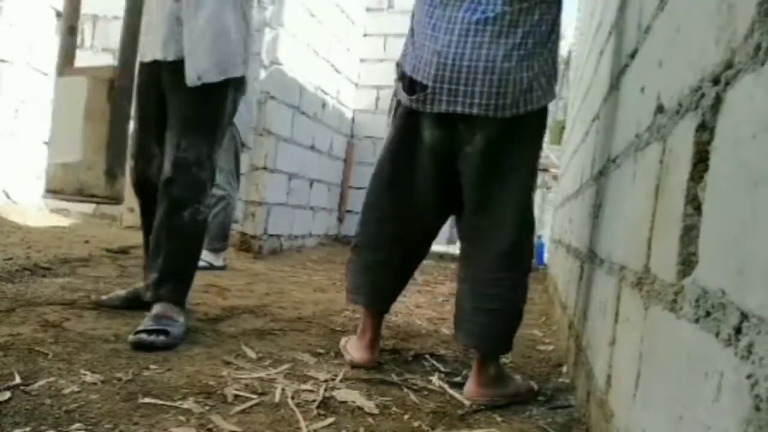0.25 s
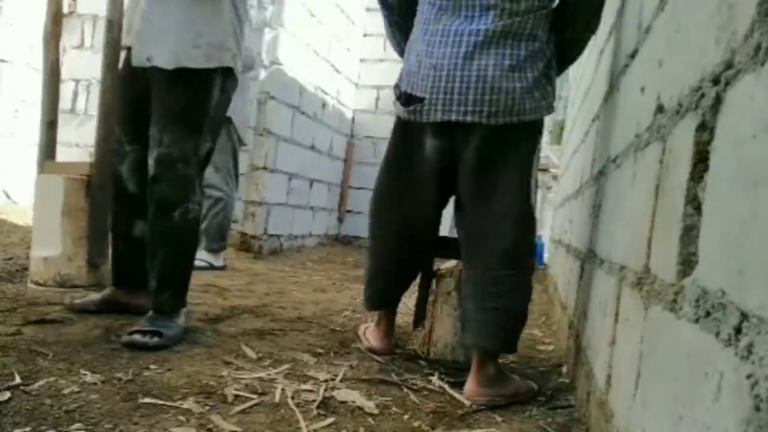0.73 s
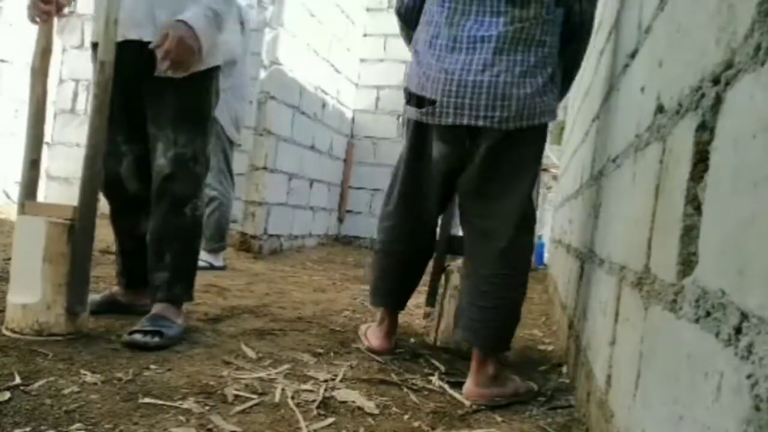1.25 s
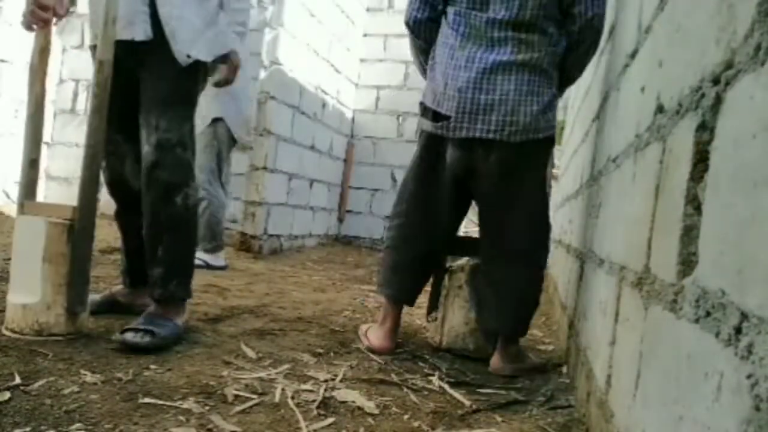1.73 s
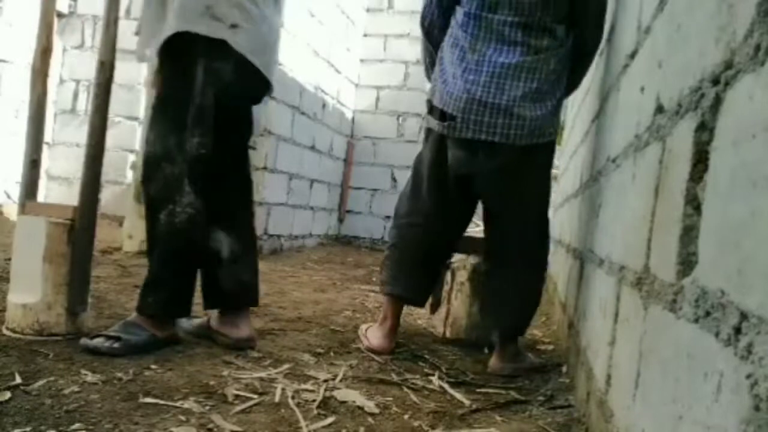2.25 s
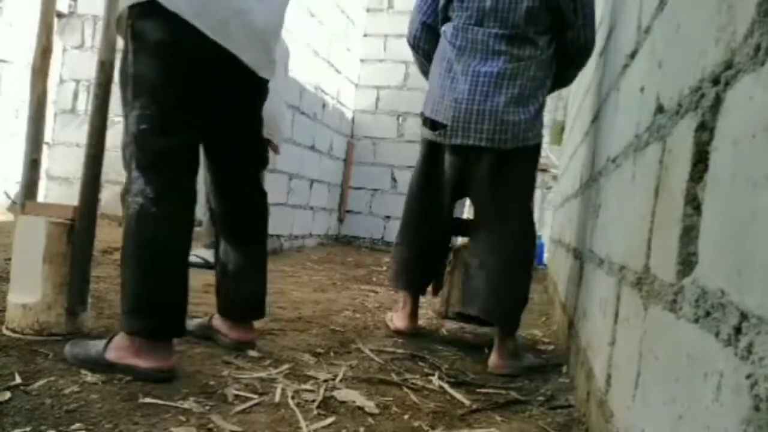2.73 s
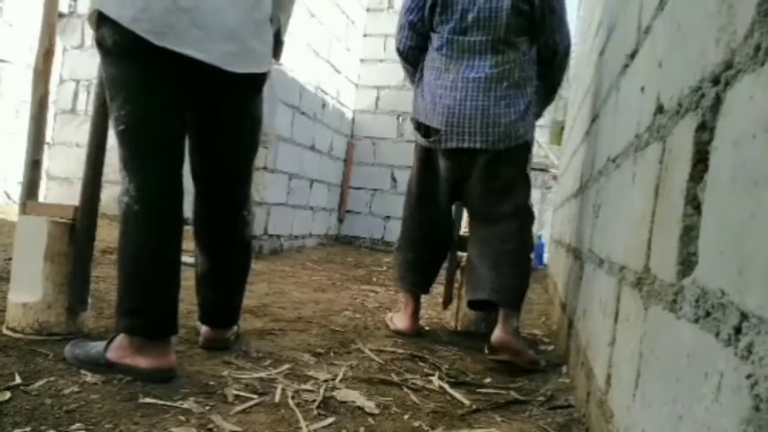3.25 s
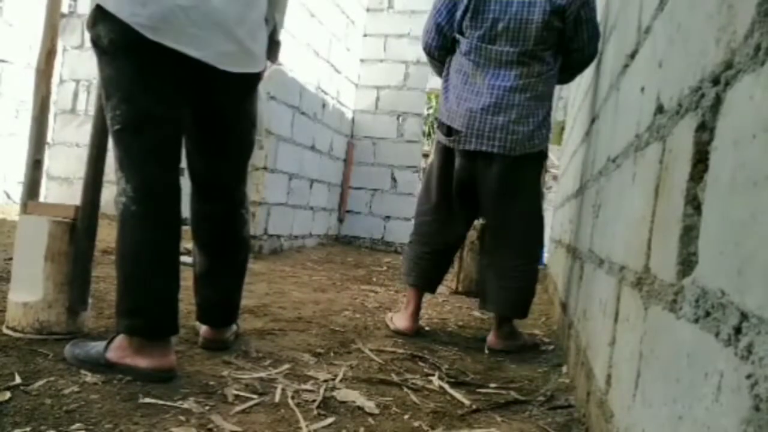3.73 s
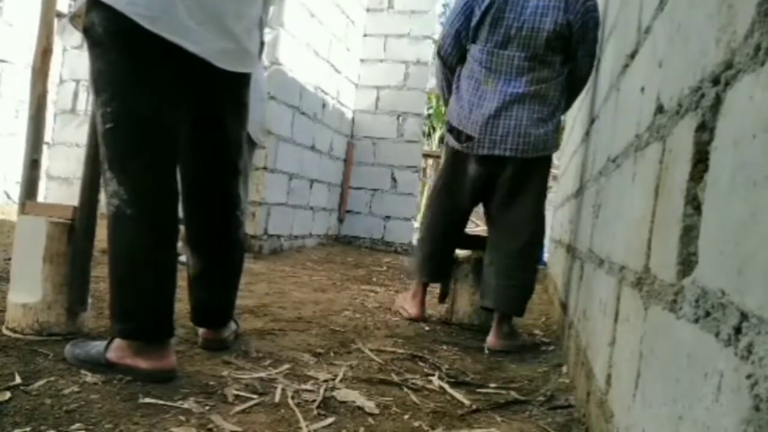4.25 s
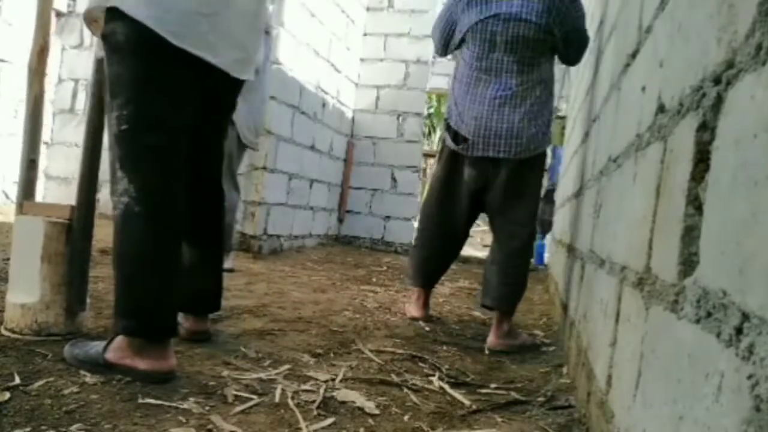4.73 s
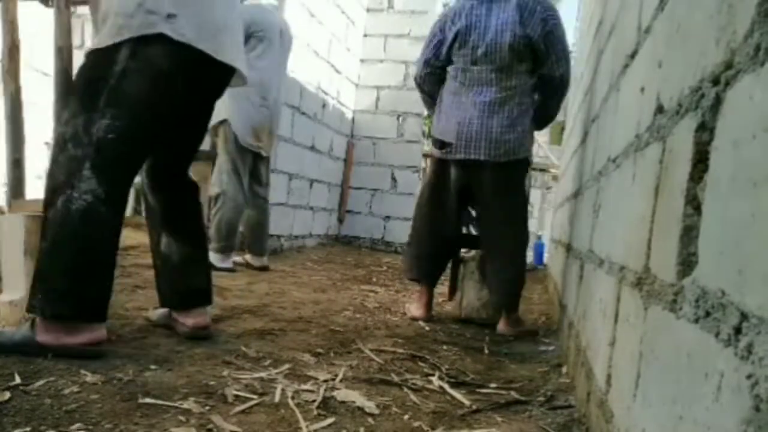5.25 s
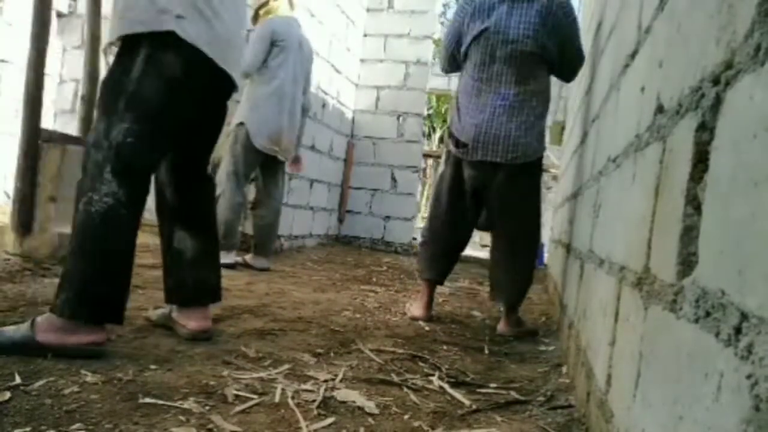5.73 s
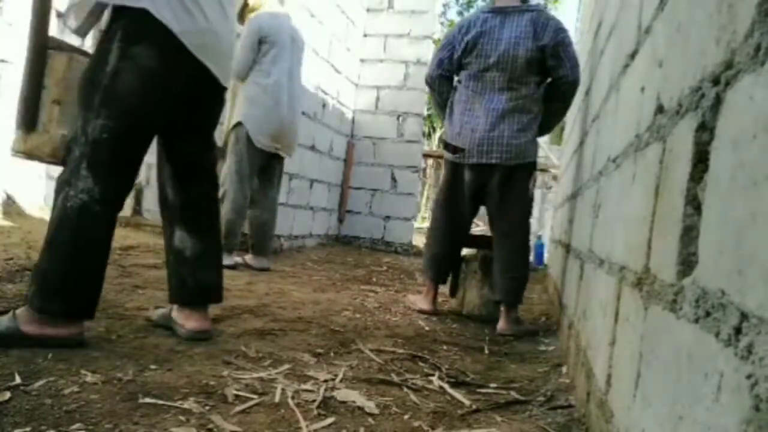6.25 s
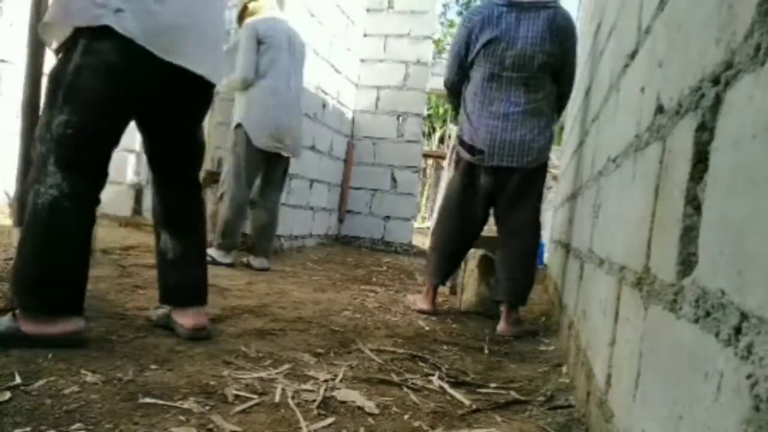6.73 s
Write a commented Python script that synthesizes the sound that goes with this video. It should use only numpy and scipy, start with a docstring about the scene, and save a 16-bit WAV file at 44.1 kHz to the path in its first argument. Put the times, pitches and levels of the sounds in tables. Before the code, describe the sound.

Dull, weighty thumps of wood on earth run from start to end, loosely timed, some in near-double hits. Each is low and short, with a hollow knock, a crackle of grit and a quick ring off the walls. Between blows, feet push crumbly soil, sandals scrape and dry bits snap lightly. A faint distant high tone wavers briefly late on. The stereo microphone sits low in the small walled yard; the background is very quiet.

```python
"""Workers drop heavy wooden tampers on loose soil inside roofless block walls.
Blows fall from start to end: damped ground and wood resonances and a burst of gritty noise, with wall echoes.
Between them swelling streams of grains make soil slides and sandal scuffs; short noise bursts make snaps.
Past the middle a thin tone whines faintly far away. Faint ticks and shaped noise lie under it all."""
import sys
import numpy as np
from scipy import signal
from scipy.fft import rfft, irfft
from scipy.io import wavfile
from scipy.ndimage import uniform_filter1d

SR = 44100
rng = np.random.default_rng(int(sys.argv[2]) if len(sys.argv) > 2 else 0)


def int16_out(signal):
    """Quantize to a 16-bit WAV file."""
    q = np.round(np.clip(np.atleast_2d(signal).T, -1, 1) * 32767)
    wavfile.write(sys.argv[1], SR, q.astype(np.int16))


N = 308700
SIZE = 32768  # samples in one blow or snap with its ring
HZ, T = np.fft.rfftfreq(SIZE, 1 / SR), np.arange(SIZE) / SR


def amp(db):
    """Decibels to gain."""
    return 10 ** (np.asarray(db) / 20)


def read(points, hz, column=1):
    """Reads one column of a table on a log-frequency axis."""
    table = np.transpose(points)
    return np.interp(np.log(hz + 1), np.log(table[0]), table[column])


def add(mix, s, sound):
    """Mixes a stereo sound in at time s, trimmed at both ends of the mix."""
    start = round(s * SR)
    part = mix[:, max(start, 0):start + sound.shape[1]]
    part += sound[:, max(-start, 0):][:, :part.shape[1]]


def colour(x, points):
    """Shapes a sound by a spectrum, keeping the power of white noise."""
    gain = amp(read(points, np.fft.rfftfreq(x.shape[-1], 1 / SR)))
    return irfft(rfft(x) * gain / np.sqrt(np.mean(gain ** 2)), x.shape[-1])


def mode(hz, width):
    """Response of one damped resonance, gain 1 at its centre; width in Hz."""
    return 1j * HZ * width / (hz ** 2 - HZ ** 2 + 1j * HZ * width)


def grains(size, spread_db):
    """Stereo noise in grains of 32 samples whose levels vary at random."""
    levels_db = spread_db * np.repeat(rng.standard_normal(size // 32 + 1), 32)[:size]
    x = rng.standard_normal((2, size)) * amp(levels_db)
    return x / x.std()


def tampers(grit_room_db=1, lift_hz=3000, lift_width=2800):
    """Each blow packs the soil and arrives directly, off the near walls, and as the ring of the yard."""
    # Each row: start in seconds, tamper, relative force in dB, wooden knock relative to the force in dB,
    # grit under the face relative to an ordinary crunch in dB.
    blows = [(-.115, "far", -5, 4.5, 5), (.316, "left", 3.5, -9, -2), (.354, "wall", 3, -2.5, -1),
             (.537, "soft", -12, 1, -3.5), (1.0282, "left", 1, 0.5, 3), (1.1475, "soft", -9.5, 0.5, -5.5),
             (1.2371, "wall", 2, 4.5, -4), (2.0314, "far", -3.5, 0.5, -.5), (2.1333, "wall", 3, 2, -3),
             (3.037, "wall", 2.5, 3, -3), (3.47, "far", -3.5, 8, 1), (3.963, "wall", 5, -2.5, -0.5),
             (4.0712, "far", -3, 4.5, 1), (4.6435, "far", -3, 4, -6), (4.8376, "wall", 3, 5, -5),
             (5.2735, "far", -2, 4.5, 3), (5.719, "left", 2.5, -7, 5.5), (5.7555, "wall", 3, -3, 4),
             (6.386, "left", 2.5, 0.5, 6.5), (6.4424, "soft", -11, 1, -6), (6.716, "wall", 2.5, 5, -3.5)]
    # Each tamper on its patch of soil: first thump in Hz, rise with each blow as the soil packs in Hz,
    # knock in Hz, cut-off of the soil's cushion at ordinary grit in Hz, lift of the grit around 3 kHz in dB.
    tamper_tuning = {"wall": (235, 3, 766, 870, 1.4), "left": (244.5, 0, 860, 1000.5, 1),
                     "far": (199.5, 6, 699, 1120, -2), "soft": (170, 35, 708.5, 980, -2.5)}
    # Each place: lead of the grit at the left microphone in ms, left-minus-right level of the grit in dB,
    # relative room level in dB, strength of the wall echoes in dB.
    places = {"wall": (0.37, 0.5, -13, -1), "left": (0.3, 1.3, -12, 0.5), "far": (0.35, -1, -14, -2),
              "soft": (-0.04, -2, -10.5, 0.5)}
    ordinary_grit_db = -23.5
    grit_db_per_octave = 23  # grittier soil cushions less: this much more grit doubles the cut-off
    out = np.zeros((2, N))
    struck = dict.fromkeys(tamper_tuning, 0)
    for s, place, force_db, knock_db, grit_db in blows:
        first_hz, packing_hz, knock_hz, cushion_hz, lift_db = tamper_tuning[place]
        lead_ms, pan_db, room_db, echo_db = places[place]
        thump_hz = first_hz + packing_hz * struck[place]
        struck[place] += 1
        cutoff_hz = cushion_hz * 2 ** (grit_db / grit_db_per_octave)
        body = thud(force_db, thump_hz, force_db + knock_db, knock_hz, cutoff_hz)
        lift = 1 + (amp(lift_db) - 1) * mode(lift_hz, lift_width)
        grit = crunch(ordinary_grit_db + grit_db, pan_db) * lift
        lag_ms = np.maximum([[-lead_ms], [lead_ms]], 0)
        direct = body + grit * np.exp(-2j * np.pi * HZ * lag_ms / 1000)
        echoes = (body + grit) * walls(place, echo_db)
        ring = amp(room_db) * yard() * (body + amp(grit_room_db) * grit)
        fade_out = np.minimum(1, 10 * (T[-1] - T)) ** 2
        add(out, s, irfft(direct + echoes + ring) * fade_out)
    return out


def thud(thump_db, thump_hz, knock_db, knock_hz, cushion_hz, thump_width=160, knock_width=560,
         bass_hz=135, bass_damping=0.6, push_db=-23):
    """The ground and the wooden block ring briefly; loose soil cushions the treble."""
    low, high = 1j * HZ / bass_hz, 1j * HZ / cushion_hz
    thump = amp(thump_db) * mode(thump_hz, thump_width) / (1 + 1j * HZ / (2.2 * thump_hz))
    knock = -amp(knock_db - 6.5) * mode(knock_hz, knock_width) ** 2  # squared: swells before it dies
    knock = knock + amp(knock_db) * block()
    bass_cut = low ** 2 / (1 + bass_damping * low + low ** 2)
    cushion = 1 / (1 + 1.29 * high + high ** 2)
    hollow = 1 - 0.65 * mode(485, 73)  # a valley parts the thump from the knock
    push = amp(thump_db + push_db) * mode(38, 110)  # air shoved aside by the falling block
    return -amp(25) * ((thump + knock) * bass_cut * cushion * hollow + push)


def block():
    """The modes of the wooden block; how it happens to land, drawn at random, decides how each one rings."""
    # Each row: frequency in Hz, typical level relative to the knock in dB, decay by 60 dB in seconds.
    block_modes = [(565, -17, 0.035), (639.2, -14.5, 0.17), (782, -15, 0.045), (905, -16, 0.039),
                   (1090, -20, .05), (1410, -16, .045), (2180, -17, 0.031)]
    shares = rng.standard_normal(len(block_modes))
    return sum(share * amp(db) * mode(hz, np.log(1000) / np.pi / t60)
               for share, (hz, db, t60) in zip(shares, block_modes))


def crunch(grit_db, pan_db, crack=0.0018, settle=0.0035, settle_db=-19, apart=1.0):
    """Grit cracks under the face of the tamper, then crumbs settle; crack and settle in seconds."""
    # Spectrum of crushed grit. Each row: frequency in Hz, relative level in dB.
    grit_spectrum = [(200, -21), (700, -2.5), (1300, 8), (1750, 2), (2200, -0.5), (3200, -1), (4600, -2),
                     (6500, -12), (10000, -11.5), (15000, -8.5)]
    noise = grains(SIZE, spread_db=2.5)
    noise[1] = (noise[0] + apart * noise[1]) / np.hypot(1, apart)  # partly alike in both ears
    cracking = T / crack * np.exp((1 - (T / crack) ** 2) / 2)
    settling = amp(settle_db) * np.exp(-T / settle)
    shift = 256  # room for the colouring to spread backwards, trimmed off again
    sound = colour(np.roll(noise * (cracking + settling), shift, axis=1), grit_spectrum)[:, shift:]
    return rfft(sound, SIZE) * amp(grit_db + np.array([[pan_db], [-pan_db]]) / 2)


def walls(place, echo_db, mirror_hz=470, scatter_db=-5, scatter_decay=0.014, build_up=.0113, ears_hz=3200):
    """Block walls mirror the bass as distinct echoes, scatter the treble, and hold a few air modes."""
    # For each place: delays of the echoes from the near walls in seconds.
    echo_delays = {"wall": [.0039, .0112, .0151, .0229, .038], "left": [.0032, .0078, .0183, .0214, .0285],
                   "far": [.0026, .0117, .0177, .0245, .0352], "soft": [0.012, 0.018, 0.009]}
    # Air modes between the walls. Each row: frequency in Hz, level in dB, longest decay by 60 dB in seconds.
    standing_modes = [(130.4, -5.5, 0.49), (171.1, -1, 0.22), (262, -1, 0.11), (298, -3.5, 0.2),
                      (402, -6, 0.33), (584, -7.5, 0.18), (643, -1, 0.24)]
    halving_s = .028  # an echo this late has spread to half its strength
    ring_cycles = 62  # no air mode takes more cycles than this to fall by 60 dB
    smooth = 1 / np.sqrt(1 + (HZ / mirror_hz) ** 6)
    echoes = sum(np.exp(-2j * np.pi * HZ * delay) / (1 + delay / halving_s) for delay in echo_delays[place])
    mirrored = amp(echo_db) * smooth * echoes
    spray = rng.standard_normal((2, SIZE)) * np.exp(-T / scatter_decay) * (1 - np.exp(-(T / 0.0012) ** 2))
    left, other = rfft(spray / np.linalg.norm(spray[0]))
    same = 1 / (1 + (HZ / ears_hz) ** 2)  # short waves reach the two microphones differently
    right = same * left + np.sqrt(1 - same ** 2) * other
    scattered = amp(scatter_db) * np.array([left, right]) * np.sqrt(1 - smooth ** 2)
    standing = sum(amp(db) * mode(hz, np.log(1000) / np.pi / min(t60, ring_cycles / hz))
                   for hz, db, t60 in standing_modes)
    return mirrored + scattered + standing * np.exp(-2j * np.pi * HZ * build_up)


def yard(rise=0.0076, fade_in=0.022):
    """Diffuse ring between the walls: sparse taps dying band by band, the bass alike in both ears."""
    # Each row: frequency in Hz, decay by 60 dB in seconds, relative level in dB.
    yard_ring = [(50, 0.4, 8), (119, .42, 6.5), (188, 0.39, 3), (328, 0.26, 10.5), (770, 0.21, 2),
                 (1500, 0.32, -7), (4270, 0.35, -9.5), (15000, 0.2, 6)]
    taps = rng.choice([-1., 1.], (2, SIZE)) * (rng.random((2, SIZE)) < .1)
    hz, t, z = signal.stft(taps, SR, nperseg=512)
    same = 1 / (1 + (hz[:, None] / 1400) ** 2)
    z[1] = same * z[0] + np.sqrt(1 - same ** 2) * z[1]
    decay = np.exp(-np.log(1000) * t / read(yard_ring, hz)[:, None])
    z *= amp(read(yard_ring, hz, column=2)[:, None]) * decay
    onset = 1 - np.exp(-(np.maximum(T - fade_in, 0) / rise) ** 2)  # silent until fade_in seconds
    tail = signal.istft(z, SR, nperseg=512)[1][:, :SIZE] * onset
    return rfft(tail / np.linalg.norm(tail[0]))


def rubbing(strokes, spectrum, spread_db, patchy_db=3.5):
    """A stream of grains that swells and fades with each stroke, its colour shifting as the crumbs tumble."""
    t = np.arange(N) / SR
    power = sum((amp(db) * np.maximum(1 - 2 * abs(t - middle) / length, 0)) ** 2
                for middle, length, db in strokes)
    z = signal.stft(colour(grains(N, spread_db), spectrum), nperseg=512)[2]
    # random level patches, smoothed over frequency and then over time
    patches = uniform_filter1d(rng.standard_normal(z.shape[1:]), size=7, axis=0)
    patches = uniform_filter1d(patches, size=7, axis=1)
    stream = signal.istft(z * amp(patchy_db * patches / patches.std()), nperseg=512)[1][:, :N]
    return stream / stream.std() * np.sqrt(power)


def soil_slides():
    """Loose soil pushed aside by a foot or a tamper, as swelling streams of grains."""
    # Each row: middle in seconds, length in seconds, peak level in dB.
    slides = [(.14, .12, -57.5), (.635, 0.18, -56), (.9, .17, -60), (1.68, 0.42, -64), (2.21, 0.17, -53.5),
              (2.345, .14, -51.5), (2.48, 0.1, -51), (2.83, 0.26, -54.5), (4.26, 0.28, -67),
              (4.52, 0.11, -60), (4.79, 0.15, -54), (5.03, .15, -46.5), (5.2, 0.46, -55), (5.91, 0.44, -50),
              (6.84, 0.26, -48.5), (7.0, 0.061, -52)]
    # Each row: frequency in Hz, relative level in dB.
    soil_spectrum = [(300, -5), (1000, -2.5), (2000, 0.5), (4200, 7.5), (7000, -0.5), (11000, 2.5),
                     (15000, 4.5)]
    return rubbing(slides, soil_spectrum, spread_db=3)


def sandal_scuffs():
    """Sandals dragged over the ground, as streams of grains coloured by the sole."""
    # Each row: middle in seconds, length in seconds, peak level in dB.
    scuffs = [(2.35, .3, -73), (2.845, 0.16, -54), (5.13, 0.57, -65.5), (6.17, 0.15, -56.5),
              (6.305, .13, -59)]
    # Each row: frequency in Hz, relative level in dB.
    sole_spectrum = [(300, 1.5), (900, -33), (1500, 27), (2300, -27.5), (3500, 10.5), (5000, -7.5),
                     (8000, -46.5), (15000, -40)]
    return rubbing(scuffs, sole_spectrum, spread_db=3)


def snaps(rows, sharpness=2.8, room_db=-12):
    """Snaps and taps: each a short noise burst around one pitch, with a weaker low thump under it."""
    decay_s, decay_slope = 0.008, 0.55  # decay at 3 kHz; lower snaps last longer by this power
    low_ratio, low_db = 0.17, -11.5  # a weaker low thump under each snap
    out, room = np.zeros((2, N)), 1 + amp(room_db) * yard()
    for s, db, hz in rows:
        snap = mode(hz, hz / sharpness) ** 2
        low_thump = amp(low_db) * mode(low_ratio * hz, low_ratio * hz / sharpness) ** 2
        body = snap + low_thump
        decay = decay_s * (3000 / hz) ** decay_slope
        left, right = grains(SIZE, spread_db=0.0) * np.exp(-T / decay)
        burst = rfft([left, (left + right) / np.sqrt(2)]) * body / np.sqrt(np.mean(abs(body) ** 2))
        add(out, s, amp(db) * irfft(burst * room))
    return out


def footfall_snaps():
    """The louder snaps and taps underfoot, each a decaying noise burst."""
    # Each row: start in seconds, level in dB, pitch in Hz.
    snap_rows = [(1.144, -48.5, 3000), (1.679, -45.5, 3730), (1.787, -53.5, 3640), (2.458, -33, 2980),
                 (2.716, -53, 5450), (3.343, -52.5, 516), (4.364, -57.5, 740), (4.488, -49, 1400),
                 (4.495, -48, 500), (5.228, -51, 2600), (6.07, -52.5, 2670)]
    return snaps(snap_rows)


def whine(octave_below_db=-21, steady=0.51, blurred=1.0, blur_hz=35):
    """A thin far tone that wavers and ends lower, blurred by its way over the walls."""
    # Each row: time in seconds, pitch in Hz, relative level in dB.
    whine_track = [(4.64, 3580, -73), (4.799, 3520, -58), (4.978, 3420, -78), (5.15, 3560, -62),
                   (5.391, 3580, -75), (5.46, 3350, -61.5), (5.542, 3290, -62), (5.64, 3150, -79)]
    t = np.arange(N) / SR
    s, hz, db = np.transpose(whine_track)
    noise = rng.standard_normal((2, N)) + 1j * rng.standard_normal((2, N))
    blur = signal.lfilter(*signal.butter(2, blur_hz, fs=SR), noise)
    blur = steady + blurred * blur / blur.std()
    phase = 2 * np.pi * np.cumsum(np.interp(t, s, hz)) / SR
    tone = np.exp(1j * phase) + amp(octave_below_db) * np.exp(.5j * phase)
    return np.interp(t, s, amp(db), left=0, right=0) * (tone * blur).real


def ticks():
    """Faint ticks of crumbs and straw at random moments, made as small snaps."""
    per_s, level_db, spread_db = 4, -69.5, 0.5
    low, high = 2500, 7000  # Hz
    draws = rng.random((round(per_s * N / SR), 3))
    rows = [(when * N / SR, level_db + spread_db * (2 * size - 1), low * (high / low) ** pitch)
            for when, size, pitch in draws]
    return snaps(rows)


def open_air():
    """The quiet open air: steady noise shaped by a spectrum."""
    # Each row: frequency in Hz, relative level in dB.
    air_spectrum = [(30, -20.5), (150, -5.5), (400, -12), (1500, -21), (4000, -17), (8000, -22),
                    (15000, -14)]
    return amp(-79.0) * colour(rng.standard_normal((2, N)), air_spectrum)


def scene():
    """Blows, footwork, the far whine and the quiet open air."""
    ground = soil_slides() + sandal_scuffs() + footfall_snaps()
    return tampers() + ground + whine() + ticks() + open_air()


def record(dry):
    """The two microphone ports colour the sound differently; peaks are rounded off; then the band limit."""
    # Each row: frequency in Hz, left-minus-right level in dB.
    port_balance = [(100, -1.5), (350, 1.5), (850, 1), (1300, 8.5), (2400, 0.5), (4500, 4), (8000, 1),
                    (15000, -0.5)]
    tilt_db = read(port_balance, np.fft.rfftfreq(N, 1 / SR)) * np.array([[1], [-1]]) / 2
    heard = irfft(rfft(dry) * amp(tilt_db), N)
    ceiling = .6
    heard = heard / (1 + (heard / ceiling) ** 4) ** (1 / 4)
    edge_hz = 15700
    band_limit = signal.firwin(255, edge_hz, window=("kaiser", 9), fs=SR)
    return signal.oaconvolve(heard, band_limit[None], "same")


dry = scene()
out = record(dry)
int16_out(out)
```